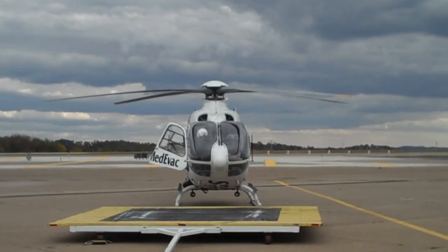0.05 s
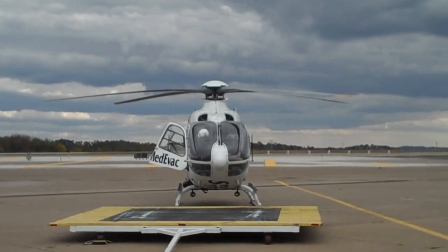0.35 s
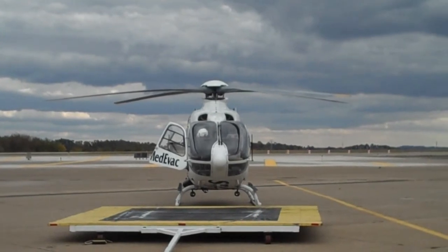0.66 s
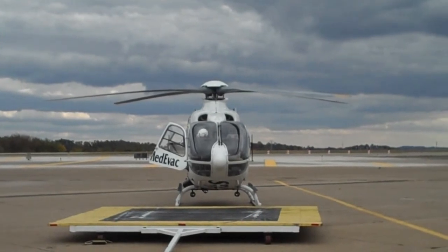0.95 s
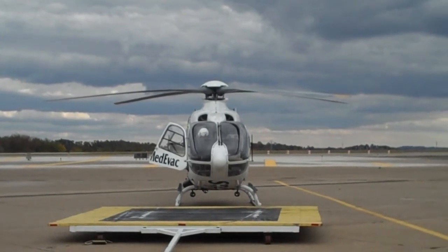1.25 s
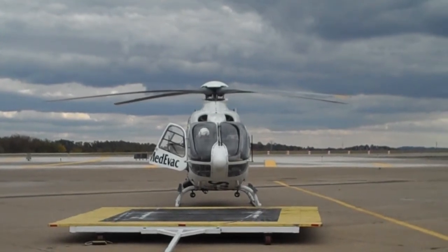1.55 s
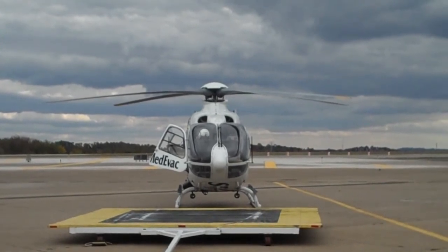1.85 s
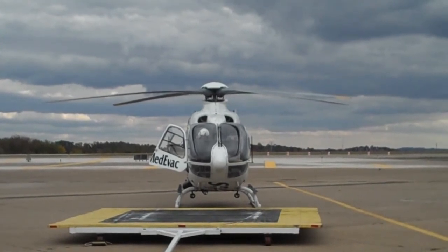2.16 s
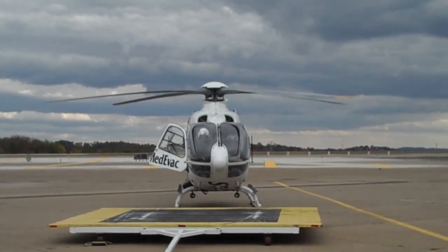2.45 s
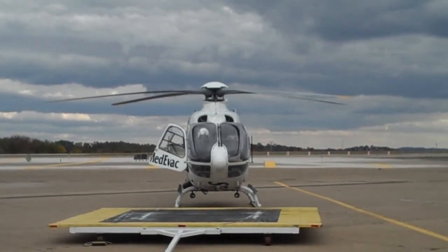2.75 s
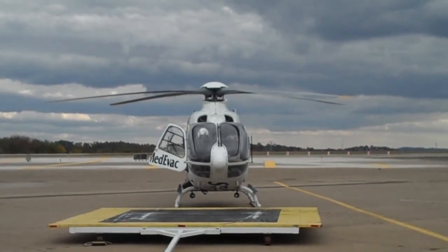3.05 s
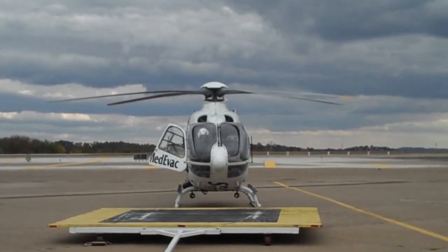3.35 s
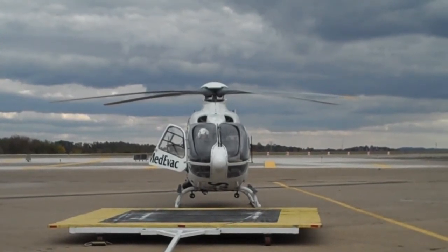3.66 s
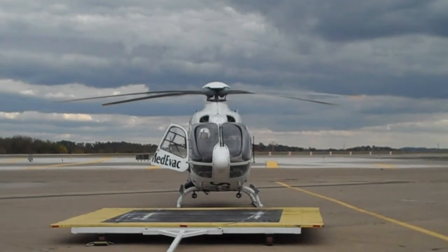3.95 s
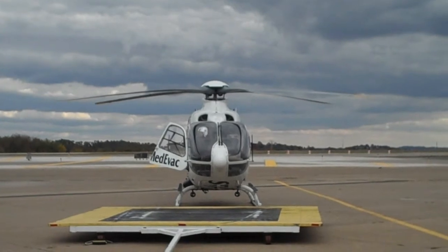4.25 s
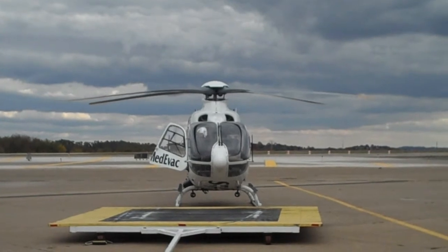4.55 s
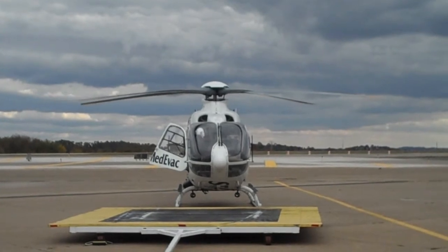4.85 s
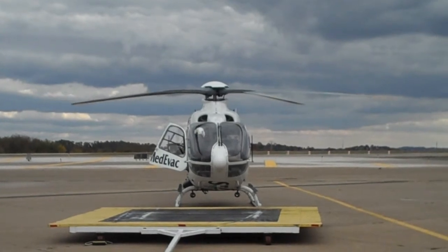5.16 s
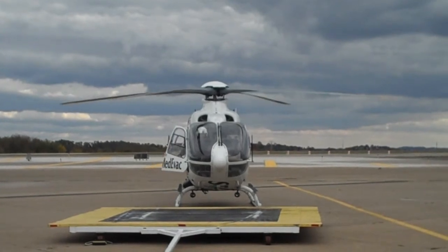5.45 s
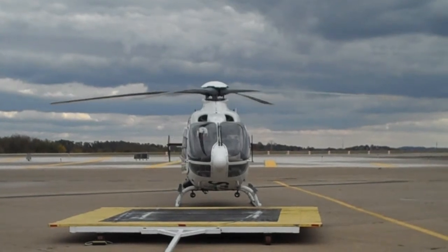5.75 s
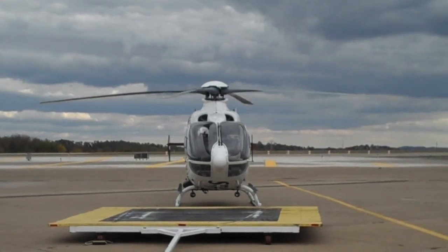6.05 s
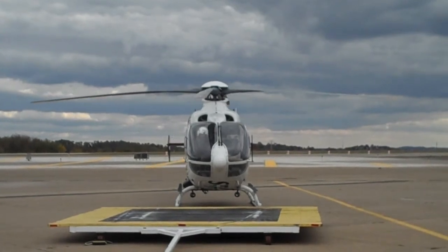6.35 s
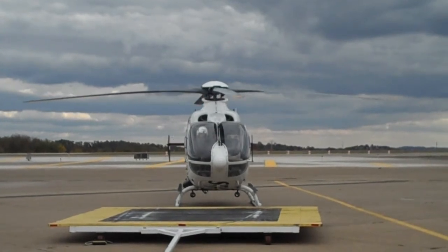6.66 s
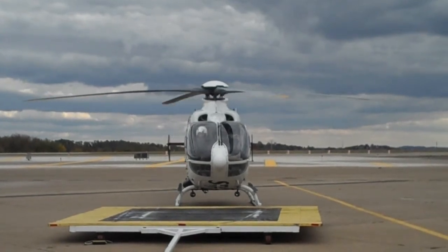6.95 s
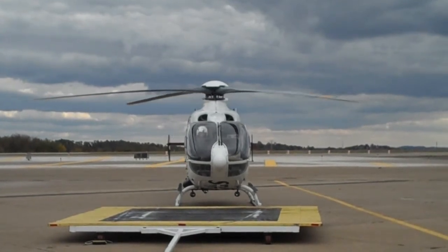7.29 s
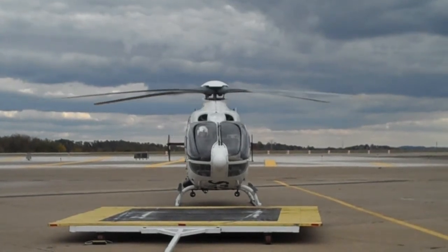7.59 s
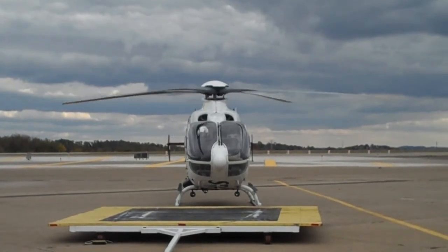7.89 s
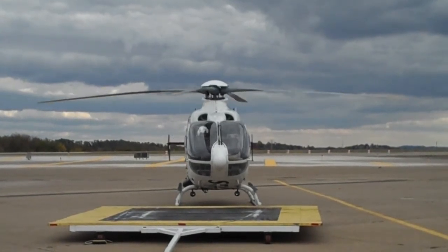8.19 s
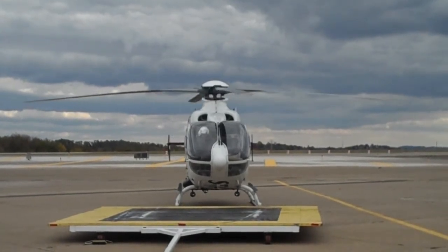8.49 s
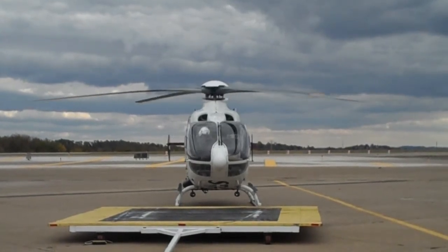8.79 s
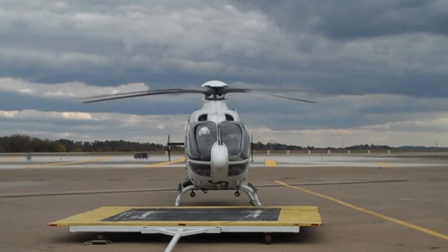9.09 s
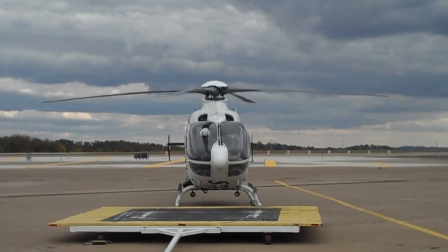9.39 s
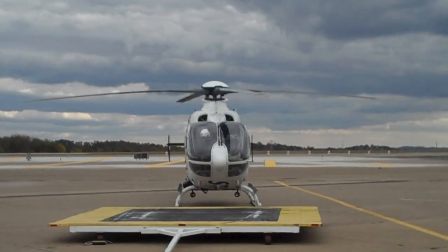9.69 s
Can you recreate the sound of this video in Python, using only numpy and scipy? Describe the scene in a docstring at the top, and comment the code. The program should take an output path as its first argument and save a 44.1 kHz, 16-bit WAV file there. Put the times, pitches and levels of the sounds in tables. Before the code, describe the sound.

Wind thumps and flutters on the microphone, mainly on the left, as a helicopter engine winds up in front of it on an open apron. The turbine begins as a faint cluster of rising tones, with a single brief panel knock soon after. It builds into a loud, piercing whine that keeps climbing and flickering in strength, while a rushing hiss and roar grow steadily underneath.

```python
"""Open apron: a helicopter turbine spools up in front of a camera with two microphone ports.
Compressor blade tones climb with the shaft; echoes in moving air fade the main one in and out.
Intake hiss and exhaust roar grow, the casing rings, a faint resonance holds its pitch.
Gusts buffet the ports, mostly the left. One knock on a cabin panel."""
import sys
import numpy as np
from scipy.fft import rfft, irfft, next_fast_len
from scipy.io import wavfile
from scipy.ndimage import uniform_filter1d, minimum_filter1d, map_coordinates

SR = 44100
rng = np.random.default_rng(int(sys.argv[2]) if len(sys.argv) > 2 else 0)


def unload_wav(signal):
    """Save mono or channel-first audio to the path in sys.argv[1] as 16-bit WAV at rate SR, clipped to [-1, 1]."""
    wavfile.write(
        sys.argv[1],
        SR,
        np.round(np.clip(np.atleast_2d(signal).T, -1, 1) * 32767).astype(np.int16),
    )


N = 437913

# breeze between gusts (time [s], level [dB])
BREEZE_DB = [(0, -28.5), (.8, -33.5), (1, -47.5), (1.35, -30), (1.6, -45.5), (1.8, -34.5), (4.5, -33.5),
             (6.3, -49.5), (6.9, -31.5), (8, -34.5), (9.93, -44)]
# left-port gusts (start [s], length [s], relative level [dB])
GUSTS = [(0.052, 0.12, -21.5), (0.232, 0.088, -27.5), (0.475, 0.073, -24.5), (0.735, 0.046, -26),
         (1.161, 0.034, -23), (1.774, 0.037, -27), (1.895, 0.079, -24.5), (2.011, 0.203, -24),
         (2.274, 0.1, -25.5), (3.21, 0.042, -23), (3.322, 0.04, -28), (3.956, 0.05, -24.5),
         (4.05, 0.14, -27), (4.334, 0.019, -33), (4.39, 0.12, -24), (4.939, 0.094, -24), (5.272, 0.12, -23),
         (6.89, 0.031, -26.5), (6.983, 0.093, -21.5), (7.14, 0.236, -25), (7.665, 0.081, -24),
         (7.81, 0.035, -26.5), (8.086, 0.036, -23.5), (8.219, 0.021, -19), (8.419, 0.06, -26.5),
         (8.529, 0.085, -20), (8.742, 0.034, -27), (8.986, 0.333, -22), (9.533, 0.034, -27.5),
         (9.719, 0.073, -24)]
# single eddies on the left port (time [s], relative peak [dB])
SLAPS = [(.054, -8.5), (.152, -7), (.294, -6), (0.49, -6), (0.549, -15), (1.212, -9.5), (1.894, -2),
         (1.915, -11), (2.079, -6), (2.116, -6), (2.221, -11.5), (2.28, -12.5), (2.602, -17),
         (2.852, -15.5), (3.125, -15), (3.224, -5.5), (4.332, -7), (7.266, -6.5), (7.739, -12.5),
         (8.432, -10.5), (9.01, -7), (9.077, -9), (9.78, -5)]
# boom against mean wind level (time [s], relative level [dB])
BOOM_DB = [(0, -12), (1.4, -10), (2, -3), (3.2, -8), (4.6, -10.5), (6.8, -3), (7.8, -14), (8.6, -4.5),
           (9.93, -12)]
# wind spectra: large, medium, small eddies (frequency [Hz], relative density [dB])
BOOM_SPECTRUM = [(15, -12), (55, -3.5), (110, -7.5), (300, -43), (1000, -120)]
RUMBLE_SPECTRUM = [(15, -20), (35, -12), (80, -1.5), (170, -2.5), (300, -15), (550, -49), (1100, -73),
                   (5000, -120)]
FLUTTER_SPECTRUM = [(30, -39), (130, 2), (240, 3.5), (450, -4.5), (900, -18), (1600, -27), (4000, -85),
                    (9000, -120)]
# port shading (frequency [Hz], left minus right [dB])
PORT_BALANCE_DB = [(500, 1.5), (1900, 1), (2550, 4.5), (2950, 3), (3500, 5.5), (4400, 4), (5000, -7),
                   (5750, -1), (6400, -6), (6900, -2), (7600, 14.5), (8700, 8), (10000, 13.5), (14000, 44)]
# gas noise at the ports (frequency [Hz], left-right correlation [1])
PORT_COHERENCE = [(100, 0.9), (500, 0.99), (1400, 1), (3000, 0.89), (7000, 0.48), (14000, 0.98)]
# cabin panel modes (frequency [Hz], relative level [dB], T60 [s])
PANEL_MODES = [(1150, -9, .09), (1600, 1, 0.074), (1950, -15, .05), (3900, 0, 0.033)]
# gas generator, one knot per SHAFT_STEP_S (speed [rev/s])
SHAFT_RPS = [80.3, 104.4, 124.8, 140.8, 153.8, 165.2, 178.6, 195.6, 214.1, 233.9, 252.6, 265.1, 274.5,
             290.6, 307.7, 322.0, 337.7]
# casing and exhaust pipe resonances (centre [Hz], width [Hz], relative level [dB])
CASING_MODES = [(1040, 56, 2), (1900, 99, 8), (2842, 27, 23), (6640, 300, -11), (7700, 320, -15)]
PIPE_MODES = [(828, 10.6, 6), (1019, 20, 9.5), (1350, 32, 6), (2197, 62, -1.5)]
# flow noise (time [s], exhaust level [dB], main-tone halo level [dB])
FLOW_DB = [(0, -44.5, -74), (.7, -49, -55), (1.3, -44.5, -46.5), (2.5, -42, -46.5), (3.5, -37, -44),
           (4.3, -34.5, -46), (5.4, -30.5, -42.5), (6.5, -30, -32), (7.9, -27, -27.5), (8.3, -29.5, -28),
           (8.8, -26.5, -24), (9.93, -24.5, -22)]
# gas noise spectra (frequency [Hz], relative density [dB])
EXHAUST_SPECTRUM = [(40, -4), (150, 4), (350, 0.5), (480, 3), (650, -4.5), (920, 1), (1200, 0),
                    (1600, -2.5), (2200, 1), (2800, -3.5), (4000, -5.5), (7000, -11), (14000, -64)]
INTAKE_SPECTRUM = [(1200, -22), (2200, 1), (2850, 4), (3300, -1.5), (4100, -8.5), (4850, 3.5), (5600, -3),
                   (6400, 6), (7000, -2.5), (7700, 3.5), (8800, -9.5), (10500, -16), (14000, -25)]
# blade and gear tones ahead of the duct
# (shaft order before rounding [1], peak [dB], peak speed [rev/s], rise [dB/oct], fall [dB/oct])
SIDE_TONES = [(8, -48.5, 132, 70, 70), (10, -47.5, 108, 106, 85), (16, -47, 163, 36, 11),
              (20, -48, 140, 23, 38), (24, -58, 115, 20, 40), (32, -52, 130, 19, 31),
              (33, -42.5, 161, 41, 13), (35, -46.5, 205, 20, 19), (39, -43.5, 165, 3, 15),
              (44, -37.5, 166, 72, 12.5), (47, -56, 132, 140, 96), (48, -56, 158, 60, 64),
              (55, -50.5, 128, 24, 24), (56, -54, 135, 0, 37), (67.3, -54, 150, 18, 49),
              (76.5, -41.5, 81, 3, 47), (116.3, -52.5, 96, 2, 55)]
# intake duct resonances (frequency [Hz], gain [dB])
DUCT_DB = [(2400, -1.5), (2850, 5.5), (3250, 3.5), (3650, -4), (4050, 3.5), (4600, -12), (5120, 1),
           (5650, -0.5), (6300, 4.5), (6900, 0), (7650, 9), (8700, -1), (11000, -12), (12000, -1),
           (12900, -17), (13750, 4), (14200, -8)]
# near echoes of the main tone (delay [ms], gain [1])
NEAR_ECHOES = [(3.855, .25), (11.66, .33), (12.66, .33)]
# main tone before fading (time [s], level [dB])
WHINE_DB = [(0, -60), (.5, -53), (.9, -46.5), (1.35, -37.5), (2.1, -41.5), (2.55, -37.5), (2.72, -27),
            (3.3, -25.5), (3.75, -29), (3.95, -39), (4.35, -31), (4.7, -17.5), (5.06, -24), (5.2, -10.5),
            (5.33, -14.5), (5.42, -22.5), (5.88, -24.5), (6.3, -13.5), (6.66, -14), (6.96, -20.5),
            (7.13, -12), (7.42, -18), (8.15, -12.5), (9.93, -13)]

GUST_ATTACK_S, GUST_RELEASE_S, GUST_GAIN_DB = 0.012, 0.032, 1
LEE_DB, LEE_SWING_SHARE, SLAP_LEE_DB = -38.5, 0.32, -19.5  # sheltered right port
KNOCK_S, RESONANCE_HZ, BAND_LIMIT_HZ = 1.476, 2834, 14430
BLADES, SHAFT_STEP_S, REF_RPS = 22, .62, 170
INTAKE_REF_DB, INTAKE_DB_PER_OCT = -38, 10
SMEAR_REF, SMEAR_EXPONENT = .6, 1.2  # scattered/direct ratio, lowest at REF_RPS
FAR_DELAY_MS, FAR_GAIN, FAR_DRIFT_RAD = 16, 0.71, 1.68
FADE_KNEE = 1.4  # swells level off above this multiple of the direct ray


def amp(db):
    """dB to gain."""
    return 10 ** (np.asarray(db) / 20)


def unit(x):
    """Scale to rms 1."""
    return x / np.sqrt(np.mean(np.abs(x) ** 2) + 1e-20)


def at_hz(points, hz):
    """Table lookup on a log frequency axis."""
    knots_hz, values = np.transpose(points)
    return np.interp(np.log(hz + 1), np.log(knots_hz + 1), values)


def curves(rows):
    """Per-sample curve for each column after time."""
    times_s, *columns = np.transpose(rows)
    return [np.interp(np.arange(N) / SR, times_s, column) for column in columns]


def wobble(rate_hz):
    """Smooth random curve, rate_hz knots a second."""
    knots = rng.standard_normal(int(N * rate_hz / SR) + 4)
    return map_coordinates(knots, [np.arange(N) * rate_hz / SR])


def filtered(x, response):
    """FFT filter with gain response(hz)."""
    size = next_fast_len(N + 8192)
    return irfft(rfft(x, size) * response(np.fft.rfftfreq(size, 1 / SR)), size)[..., :N]


def noise(spectrum):
    """Coloured mono noise, rms 1."""
    return unit(filtered(rng.standard_normal(N), lambda hz: amp(at_hz(spectrum, hz))))


def stereo_noise(response):
    """Coloured noise, rms 1, partly coherent between ports."""
    def mid_side(hz):
        mix_rad = np.arccos(np.clip(at_hz(PORT_COHERENCE, hz), -1, 1)) / 2
        return response(hz) * np.array([np.cos(mix_rad), np.sin(mix_rad)])
    mid, side = filtered(rng.standard_normal((2, N)), mid_side)
    return unit(np.array([mid + side, mid - side]))


def scatter(width_hz, slope):
    """Complex random gain, rms 1; spreads a tone over about width_hz."""
    re, im = filtered(rng.standard_normal((2, N)), lambda hz: (1 + (hz / width_hz) ** 2) ** (-slope / 2))
    return unit(re + 1j * im)


def wind_db():
    """Gusts rise, hold and die over a restless breeze."""
    t = np.arange(N) / SR
    strength = amp(curves(BREEZE_DB)[0] + 4 * wobble(12))
    for start_s, length_s, db in GUSTS:
        end_s = start_s + length_s
        shape = np.interp(t, [start_s - GUST_ATTACK_S, start_s, end_s, end_s + GUST_RELEASE_S], [0, 1, 1, 0])
        strength = np.maximum(strength, amp(db + GUST_GAIN_DB) * shape)
    return 20 * np.log10(strength)


def buffet(db):
    """Wind on one port: lumpy rumble, flutter in strong gusts, popping eddies."""
    rumble = amp(db - 2.5 + 3.6 * wobble(35)) * noise(RUMBLE_SPECTRUM)
    flutter = amp(db - 9.5 + 0.67 * (db + 25.5) + 7.5 * wobble(90)) * noise(FLUTTER_SPECTRUM)
    eddies = (rng.random(N) < 70 / SR) * rng.uniform(-1.02, 1, N)  # about 70 a second
    pops = unit(filtered(eddies, lambda hz: amp(at_hz(FLUTTER_SPECTRUM, hz))))
    return rumble + flutter + pops * amp(db - 8.0 + 0.075 * (db + 39.5))


def slaps():
    """Single eddies burst on the ports and die fast, each with a low thud."""
    force = np.zeros((2, N + SR))
    t = np.arange(SR // 8) / SR
    shape = (1 - np.exp(-t / .0015)) * amp(-60 * t / .06)
    for time_s, db in SLAPS:
        start = round(time_s * SR)
        force[:, start:start + len(t)] += amp([[db], [db + SLAP_LEE_DB]]) * shape
    swirl = np.array([noise(FLUTTER_SPECTRUM), noise(FLUTTER_SPECTRUM)])
    swirl += amp(-11.5) * noise(BOOM_SPECTRUM)
    return 1.2 * force[:, :N] * swirl / np.hypot(1, swirl / 2)  # soft-limited swirl


def wind():
    """Small eddies hit each port separately; the largest boom about equally on both."""
    left_db = wind_db()
    right_db = LEE_DB + LEE_SWING_SHARE * (left_db - left_db.mean()) + 2.1 * wobble(5.5)
    boom_db = (left_db + right_db) / 2 + curves(BOOM_DB)[0] + 4.9 * wobble(8)
    boom = amp(boom_db) * np.array([noise(BOOM_SPECTRUM), noise(BOOM_SPECTRUM)])
    return np.array([buffet(left_db), buffet(right_db)]) + boom + slaps()


def port_shading(x):
    """The camera body shades each port differently; the left is one sample farther away."""
    def response(hz):
        ratio = amp(at_hz(PORT_BALANCE_DB, hz))
        left = ratio * np.exp(-2j * np.pi * hz / SR)
        return np.array([left, np.ones_like(hz)]) * 2 / (1 + ratio)
    return filtered(x, response)


def knock():
    """A struck cabin panel rings and rattles briefly."""
    t = np.arange(SR // 4) / SR
    ring = sum(amp(db - 60 * t / t60_s) * np.sin(2 * np.pi * hz * t) for hz, db, t60_s in PANEL_MODES)
    rattle_spectrum = [(500, -6.5), (1100, 1), (1900, -1), (2600, -23), (7000, -5), (14000, -52)]
    rattle = amp(-60 * t / 0.11) * noise(rattle_spectrum)[:len(t)]
    hit = amp(-33.5) * ring + amp(-27.5) * rattle
    return np.pad(hit, (round(KNOCK_S * SR), N))[:N]


def shaft():
    """Shaft speed and angle, smoothed by inertia."""
    knots = np.pad(SHAFT_RPS, 4, mode="reflect", reflect_type="odd")
    speed_rps = map_coordinates(knots, [np.arange(N) / SR / SHAFT_STEP_S + 4])
    return speed_rps, 2 * np.pi * np.cumsum(speed_rps) / SR


def intake_db(speed_rps):
    """Intake level: equal steps per doubling of speed."""
    return INTAKE_REF_DB + INTAKE_DB_PER_OCT * np.log2(speed_rps / REF_RPS)


def resonance(speed_rps):
    """Faint wavering ring at one pitch, a narrow resonance; grows with intake flow."""
    carrier = np.exp(2j * np.pi * RESONANCE_HZ * np.arange(N) / SR)
    return amp(intake_db(speed_rps) - 20.0) * np.real(scatter(width_hz=8.9, slope=3.3) * carrier)


def casing(angle_rad):
    """Unequal blades repeat one pattern per turn; its overtones sweep the casing resonances."""
    def response(hz):
        return sum((-1) ** k * amp(db) * 1j * hz * width / (centre ** 2 - hz ** 2 + 1j * hz * width)
                   for k, (centre, width, db) in enumerate(CASING_MODES))
    turn_rad = np.linspace(0, 2 * np.pi, num=1024)
    pattern = irfft(np.exp(2j * np.pi * rng.random(size=62)), len(turn_rad))
    buzz = np.interp(angle_rad % (2 * np.pi), turn_rad, pattern) * amp(6.4 * wobble(13))
    return amp(-54) * unit(filtered(buzz, response))


def gas_noise(speed_rps):
    """Exhaust roars through its pipe resonances; air hisses into the intake."""
    def exhaust_response(hz):
        pipe_power = sum(amp(db) ** 2 / (1 + (2 * (hz - centre) / width) ** 2)
                         for centre, width, db in PIPE_MODES)
        return np.sqrt(amp(at_hz(EXHAUST_SPECTRUM, hz)) ** 2 + 1.6 * pipe_power)
    roar = stereo_noise(exhaust_response)
    hiss = stereo_noise(lambda hz: amp(at_hz(INTAKE_SPECTRUM, hz)))
    roar *= amp(curves(FLOW_DB)[0] + 1.17 * wobble(9))
    hiss *= amp(intake_db(speed_rps) + 1.2 * wobble(11))
    return roar + hiss


def side_tones(speed_rps, angle_rad):
    """Further blade rows and gears, heard through the duct: part direct, part smeared by turbulence."""
    smear = SMEAR_REF * np.maximum(speed_rps / REF_RPS, REF_RPS / speed_rps) ** SMEAR_EXPONENT
    tones = np.zeros(N)
    for order, peak_db, peak_rps, rise, fall in SIDE_TONES:
        octaves = np.log2(speed_rps / peak_rps)
        level = amp(peak_db + np.minimum(rise * octaves, -fall * octaves))
        direct = unit(amp(4.5 * wobble(15))) * np.exp(.6j * wobble(24))
        ray = (direct + smear * scatter(width_hz=63, slope=3.8)) / np.hypot(1, smear)
        tones += np.sqrt(2) * level * np.real(ray * np.exp(1j * round(order) * angle_rad))
    return filtered(tones, lambda hz: amp(at_hz(DUCT_DB, hz)))


def echo_fading(hz):
    """Near echoes swell the climbing tone; a far one, drifting with the wind, cuts brief dropouts."""
    near = np.abs(1 + sum(gain * np.exp(-2j * np.pi * hz * ms / 1000) for ms, gain in NEAR_ECHOES))
    far_lag_rad = 2 * np.pi * hz * FAR_DELAY_MS / 1000 + FAR_DRIFT_RAD * wobble(7)
    swell = near * np.abs(1 + FAR_GAIN * np.exp(1j * far_lag_rad))
    return unit(swell / np.hypot(FADE_KNEE, swell))


def whine(speed_rps, angle_rad):
    """Blade-passing tone: direct ray, scattered rays per port, halo from turbulence at the blades."""
    level = amp(curves(WHINE_DB)[0]) * echo_fading(BLADES * speed_rps)
    direct = amp(1.3 * wobble(45)) * np.exp(.6j * wobble(14))
    rays = np.array([scatter(width_hz=29, slope=2.6), scatter(width_hz=30, slope=1.8)])
    halo = amp(curves(FLOW_DB)[1] + 1.5 * wobble(16)) * scatter(width_hz=320, slope=1.82)
    envelope = level * (0.83 * direct + 0.35 * rays) + halo
    return np.sqrt(2) * np.real(envelope * np.exp(1j * BLADES * angle_rad))


def scene():
    """Helicopter through both ports, plus wind on each."""
    speed_rps, angle_rad = shaft()
    tones = whine(speed_rps, angle_rad) + side_tones(speed_rps, angle_rad)
    helicopter = tones + casing(angle_rad) + resonance(speed_rps) + gas_noise(speed_rps) + knock()
    return port_shading(helicopter) + wind()


def record(dry):
    """Peak limiter at full scale, then band limit."""
    needed_gain = 1 / np.maximum(np.abs(dry).max(axis=0), 1)
    gain = uniform_filter1d(minimum_filter1d(needed_gain, size=441), size=441)  # 10 ms windows
    return filtered(dry * gain, lambda hz: hz < BAND_LIMIT_HZ)


dry = scene()
out = record(dry)
unload_wav(out)
```